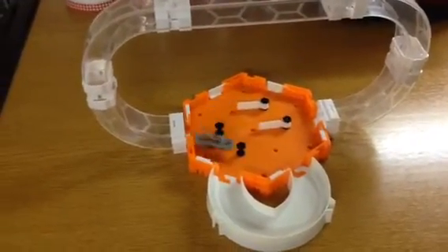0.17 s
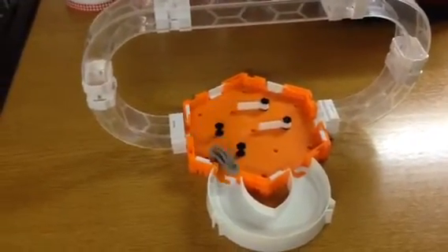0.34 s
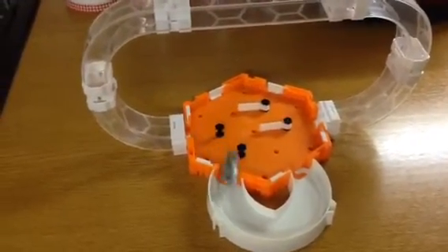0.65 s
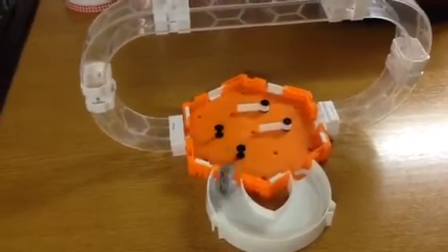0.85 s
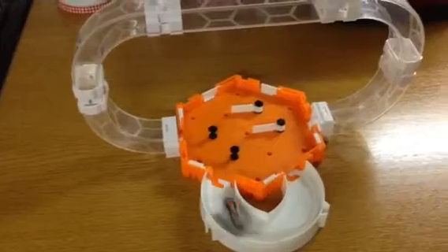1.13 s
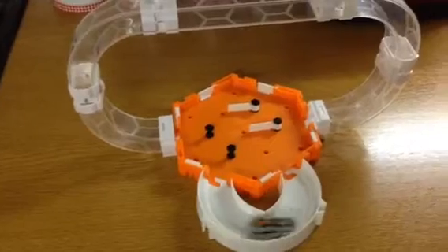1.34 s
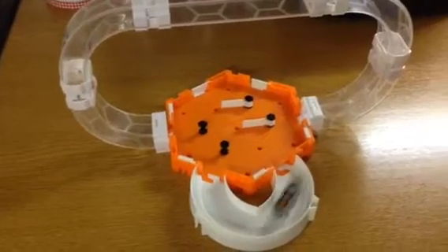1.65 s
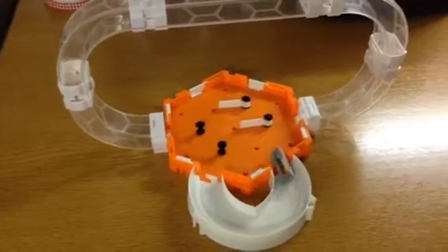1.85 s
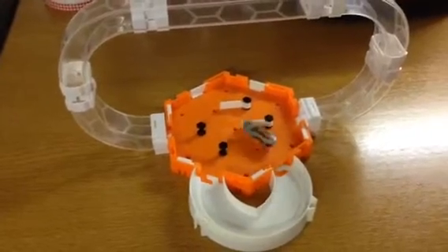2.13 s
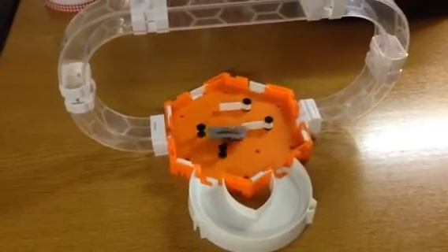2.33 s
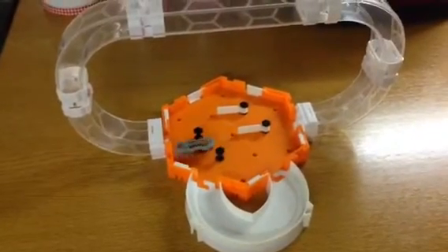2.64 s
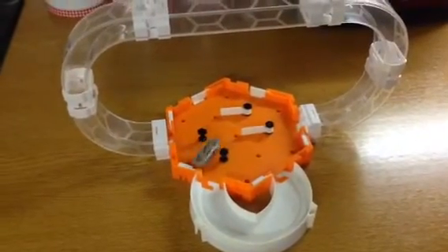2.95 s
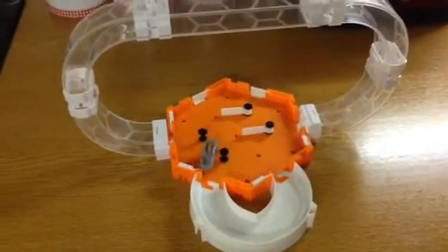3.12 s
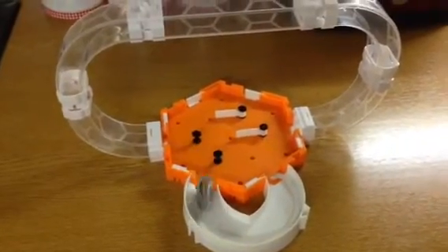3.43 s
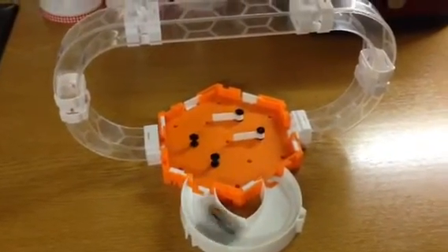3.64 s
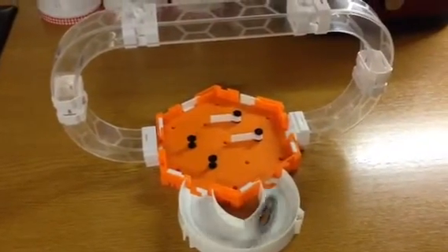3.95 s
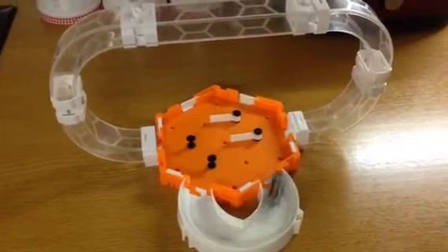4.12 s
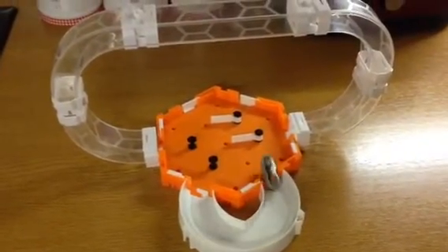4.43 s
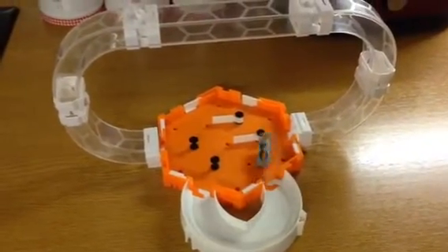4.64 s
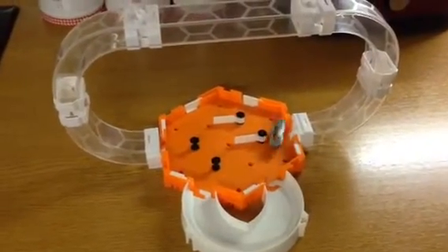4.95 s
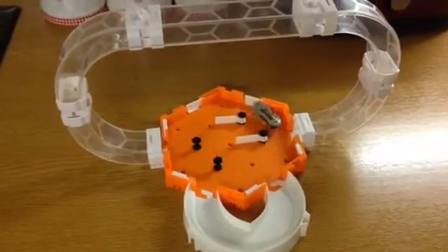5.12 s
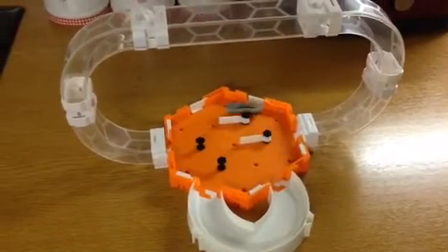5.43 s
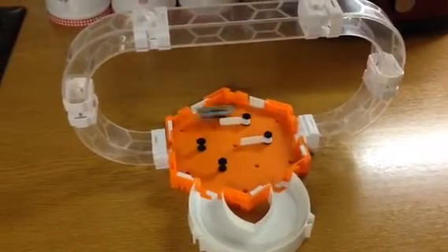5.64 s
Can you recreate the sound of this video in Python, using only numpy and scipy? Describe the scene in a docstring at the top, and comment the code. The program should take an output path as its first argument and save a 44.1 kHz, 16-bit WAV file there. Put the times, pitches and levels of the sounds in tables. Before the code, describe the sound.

A small vibrating toy bug runs for about six seconds in a plastic arena on a wooden table, heard close in a small, quiet room with faint hiss. A wavering motor buzz near 150 Hz paces a dense, dry patter of legs, with a thin high whirr above and an uneven low drone in the table. Light grazes chatter along the walls throughout. Around 0.45-0.65 s there are a knock and several soft, dull thuds. From about 0.8 to 1.8 s, in the curved track, the patter is duller and quieter, with a brief rough joint chirp near 1.65. At 2.2 s a tight burst of hard clacks makes the plastic ring, the loudest moment. Sharp clicks follow at 2.64, 2.93 and 3.12. A second, softer loop lasts from about 3.5 to 4.3 s, then brighter rattling returns, with knocks near 4.27, 4.73, 4.95, 5.3 and 5.62, still buzzing at the end.

```python
"""Vibrating toy bug in a plastic arena

A motor whirrs and legs tap once per turn: noise bursts and short modes paced by a wavering motor clock. Knocks
and wall grazes are trains of filtered noise, each with its own brightness and spot resonance. The plastic rings
and a loose joint chirps as damped modes; the wooden table drones and thuds. A small room adds a diffuse noise
tail and a faint hiss."""
import sys
import numpy as np
from scipy import signal
from scipy.fft import rfft, irfft, next_fast_len
from scipy.io import wavfile
from scipy.ndimage import uniform_filter1d, map_coordinates

SR = 44100
rng = np.random.default_rng(int(sys.argv[2]) if len(sys.argv) > 2 else 0)


def digitize_waveform(pressure):
    """Quantize a signal to 16-bit integers and store it at the path in sys.argv[1].

    Rows of a 2-D input are taken as channels; values are limited to [-1, 1].
    """
    field = np.atleast_2d(pressure).T
    bounded = np.clip(field, -1, 1)
    quanta = np.round(bounded * 32767).astype(np.int16)
    wavfile.write(sys.argv[1], SR, quanta)


N = 254898

MOTOR_HZ = 154.5
TOP_HZ = 15650


def footfalls(waver, scatter_s, spread_db):
    """One landing per turn of the wavering motor, each a little early or late and of its own strength."""
    turns = np.cumsum(MOTOR_HZ * np.exp(waver * wobble(14))) / SR
    at = np.flatnonzero(np.diff(np.floor(turns)))
    late, size = rng.uniform(-0.99, 1, (len(at), 2)).T
    at = np.clip(at + scatter_s * SR * late, 0, N - 1).astype(int)
    return np.bincount(at, amp(spread_db * size), N)


# Leg drive on the plastic, least where the bug coasts. Each row: time in s, relative patter level in dB.
LEG_DRIVE = [(0.0, -48), (0.25, -57.5), (0.58, -52.5), (0.72, -55.5), (0.98, -57), (1.09, -52.5),
             (1.22, -50), (1.36, -57.5), (1.48, -60), (1.63, -58), (1.78, -48), (2.08, -55), (2.28, -48),
             (2.55, -50), (2.74, -55), (2.95, -51.5), (3.07, -62), (3.2, -49.5), (3.48, -62), (3.6, -52),
             (3.85, -55), (4.05, -59), (4.3, -50), (4.55, -56), (4.9, -51.5), (5.0, -47), (5.14, -51.5),
             (5.33, -55.5), (5.52, -55), (5.78, -53)]
# Filters of leg patter and leg scratch. Each row: frequency in Hz, relative level in dB.
PATTER_TONE = [(40, -100), (250, -2), (550, -7.5), (780, -0.5), (950, -8), (1300, -2), (1800, 1),
               (2300, -9), (2900, -15), (4500, -12.5), (15000, -48)]
SCRATCH_TONE = [(1500, -26), (2500, -25), (3400, 4.5), (4500, 2), (5300, -1), (8500, -10), (11000, -31),
                (15500, -24)]
TRAY_SCRATCH_DB, LOOP_SCRATCH_DB = 0, -5.5  # relative to the patter setting


def legs(steps, tap_t60, flutter_db):
    """Each landing is a tiny noise burst on a new spot of the plastic floor."""
    patter_db, = curves(LEG_DRIVE)
    scratch_db = patter_db + by_place(TRAY_SCRATCH_DB, LOOP_SCRATCH_DB)
    t = np.arange(SR // 20) / SR
    # separate spots: energies add
    energy = np.abs(signal.fftconvolve(steps ** 2, fade(t, tap_t60) ** 2)[:N])
    force = np.sqrt(energy) * amp(flutter_db * wobble(45))
    patter_noise, scratch_noise = force * rng.standard_normal((2, N))
    patter = amp(patter_db - 6.5) * toned(patter_noise, PATTER_TONE)
    scratch = amp(scratch_db - 7.5) * toned(scratch_noise, SCRATCH_TONE)
    return patter + scratch


def leg_ticks(steps, level_db, tray_hz, loop_hz, spread_octaves, t60_cycles):
    """Every landing also clicks, with three short modes of its own."""
    at, t = np.flatnonzero(steps), np.arange(SR // 50) / SR
    draws = rng.standard_normal((len(at), 2, 3))
    pitch, size = draws.transpose(1, 0, 2)[..., None]
    centre_hz = by_place(tray_hz, loop_hz)[at, None, None]
    hz = np.minimum(centre_hz * 2 ** (spread_octaves * pitch), TOP_HZ)
    decay = np.exp(-np.log(1000) * hz * t / t60_cycles)
    modes = size * decay * np.sin(2 * np.pi * hz * t)
    clicks = np.sqrt(steps[at, None]) * np.sum(modes, axis=1)
    where = at[:, None] + np.arange(len(t))
    train = np.bincount(where.ravel(), clicks.ravel(), N)[:N]
    return amp(curves(LEG_DRIVE)[0] + level_db) * unit(train)


WHIRR_HZ, WHIRR_WIDTH_HZ = 8380, 330
TRAY_WHIRR_DB, LOOP_WHIRR_DB = -70.5, -79  # before the swell


def whirr(steps, turn_t60, waver_db, follows):
    """The motor rubs once a turn and sings in one narrow, high band, louder the harder the bug shakes."""
    shake_db, = curves(TABLE_SHAKE)
    decay = fade(np.arange(SR // 10) / SR, turn_t60)
    rub = np.sqrt(np.abs(signal.fftconvolve(steps, decay)[:N]))
    noise = rub * rng.standard_normal(N)
    band = filtered(noise, lambda f: resonance(f, WHIRR_HZ, WHIRR_WIDTH_HZ))
    swell_db = follows * (shake_db - shake_db.mean()) + waver_db * wobble(12)
    return amp(by_place(TRAY_WHIRR_DB, LOOP_WHIRR_DB) + swell_db) * unit(band)


# Short hits on a wall or peg. Each row: start in s, relative level in dB, click in relative dB,
# knock in relative dB, resonance of the spot in Hz.
KNOCKS = [(0.446, -44, 10, 1, 8920), (0.4724, -29.5, -0.5, 2, 1900), (0.663, -41, -6, -3, 2670),
          (0.7398, -45, -3, -6, 9000), (0.814, -44, -38, 2, 1760), (1.3115, -42.5, -22, -6, 1900),
          (1.3265, -43.5, -13, -6, 1920), (1.4805, -49.5, -35, 0, 1850), (1.5585, -44, -20, -5, 1380),
          (2.1733, -27.5, -9.5, -6, 1700), (2.2013, -27, -8, -8, 2440), (2.2071, -23.5, 4, 3, 3160),
          (2.2136, -19.5, -6.5, -4, 2400), (2.221, -20.5, 3, -15, 2480), (2.2256, -17, 2, -5, 2500),
          (2.2445, -37, -20, 5, 3430), (2.251, -33, -14, -9, 2030), (2.261, -30.5, -14, -4, 1386),
          (2.288, -38, -22, -8, 2200), (2.3882, -35, -11, -19, 2240), (2.6347, -31, 21, -16, 8450),
          (2.64, -31.5, -11, -3, 1830), (2.9289, -29.5, -2, -11, 3340), (2.936, -35, -15, -10, 2870),
          (3.1172, -30.5, -7, 2, 2420), (3.1211, -25, -8, 5.5, 2000), (3.126, -29, -15, 6, 965),
          (3.138, -39, -15, 3, 1540), (4.263, -29.5, -21, -7, 2050), (4.2695, -33, -21.5, -9, 1540),
          (4.32, -40, -5, -9, 8700), (4.7306, -30.5, -14.5, -14, 1540), (4.947, -23.5, -8, -11.5, 1680),
          (4.9533, -35, -11, -18, 1680), (4.973, -36, -11, -21, 3320), (5.3022, -29.5, -15, -20, 2360),
          (5.3085, -29.5, -13.5, -6, 1550), (5.3165, -39, -9, -14, 3300), (5.6215, -26, -19.5, -30, 2380),
          (5.63, -34.5, -8, -28, 6900), (5.6888, -39, -2.5, -7, 1730), (5.7339, -41, -8, -19, 9200)]
# Grazes along a wall. Each row: start in s, relative level in dB, click in relative dB,
# chatter time in s, time to the hardest press in s, resonance of the spot in Hz.
GRAZES = [(0.001, -37.5, -12, 0.018, 0, 3470), (0.048, -40.5, -10, 0.027, 0.00037, 3250),
          (0.084, -33, -14, 0.013, 0.011, 2133), (0.131, -43.5, -11.5, 0.049, 0, 1450),
          (0.212, -46.5, -20, 0.036, 0.0022, 3900), (0.274, -40.5, -12.5, 0.013, 0.015, 2430),
          (0.353, -44, -14.5, 0.012, 0.0079, 2460), (0.447, -38.5, -24, 0.013, 0, 880),
          (0.625, -41.5, -16.5, 0.085, 0, 2650), (0.905, -44.5, -38, 0.013, 0.0026, 1750),
          (1.017, -48, -19, 0.011, 0.006, 1500), (1.068, -41, -30, 0.021, 0.0022, 3100),
          (1.099, -39.5, -19, 0.017, 0.0034, 1390), (1.142, -40.5, -22, 0.017, 0.0015, 1810),
          (1.192, -40, -18.5, 0.023, 0, 1240), (1.222, -41.5, -21, 0.013, 0.0043, 1390),
          (1.34, -46, -20, 0.036, 0, 1400), (1.544, -41.5, -21, 0.012, 0, 2020),
          (1.694, -49, -7, 0.011, 0.012, 1900), (1.7122, -36.5, -23, 0.0075, 0, 1850),
          (1.772, -49.5, -10, 0.031, 0.011, 2080), (1.833, -33, -21.5, 0.016, 0, 1250),
          (1.922, -45.5, -14, 0.02, 0, 2030), (2.003, -40.5, -15, 0.0098, 0.0088, 1960),
          (2.055, -41, -23, 0.017, 0.0023, 1250), (2.098, -35, -17, 0.021, 0, 2000),
          (2.148, -35.5, -17, 0.022, 0, 1610), (2.388, -39, -11.5, 0.045, 0.0056, 1770),
          (2.45, -41.5, -15, 0.025, 0, 2400), (2.494, -43, -11, 0.032, 0.027, 3040),
          (2.597, -44, -10, 0.0094, 0, 1650), (2.702, -42.5, -16, 0.012, 0.01, 3730),
          (2.7685, -39.5, -16, 0.0087, 0, 1800), (2.842, -41.5, -9, 0.032, 0, 5930),
          (2.978, -40, -16, 0.034, 0, 3850), (3.0712, -41, -13, 0.018, 0, 1660),
          (3.2135, -38, -8, 0.01, 0, 900), (3.265, -46, -17, 0.015, 0.011, 3030),
          (3.343, -44, -13, 0.017, 0.0087, 2300), (3.515, -48.5, -29, 0.0087, 0.0018, 1230),
          (3.561, -37.5, -18.5, 0.013, 0.0036, 1250), (3.602, -45, -32, 0.056, 0.0065, 1540),
          (3.674, -42.5, -15.5, 0.018, 0, 1620), (3.8785, -38, -12, 0.014, 0.0033, 2860),
          (4.15, -44.5, -20.5, 0.099, 0.0082, 1230), (4.255, -41.5, -24, 0.041, 0.0029, 2180),
          (4.38, -34.5, -17, 0.027, 0.0003, 1000), (4.522, -41.5, -13.5, 0.021, 0.0038, 1980),
          (4.576, -44, -13.5, 0.015, 0, 1230), (4.659, -40.5, -10, 0.02, 0, 1650),
          (4.695, -40, -15, 0.045, 0, 1810), (4.798, -42, -19, 0.016, 0.0097, 1370),
          (4.892, -37, -17, 0.012, 0.0019, 2100), (5.045, -40.5, -17, 0.029, 0.00046, 1090),
          (5.097, -41, -17.5, 0.028, 0.00076, 3016), (5.187, -39.5, -10.5, 0.016, 0.0002, 3340),
          (5.212, -35.5, -7, 0.019, 0.021, 6800), (5.27, -41, -10, 0.02, 0.0033, 2430),
          (5.345, -41, -11, 0.014, 0, 2840), (5.386, -43, -10, 0.012, 0.0052, 6680),
          (5.419, -39, -8, 0.035, 0.0077, 9190), (5.544, -48.5, -12, 0.008, 0.00053, 3320),
          (5.577, -45, -16, 0.018, 0.011, 2450), (5.611, -36, -13, 0.018, 0.0014, 2340),
          (5.771, -43, -13, 0.012, 0, 3660)]
KNOCK_CHATTER_S = 0.004  # a short hit dies away within a turn or two
GRAZE_KNOCK_DB = -3  # body of a graze or brush
KNOCK_SPOT_DB, GRAZE_SPOT_DB = 11, 6.5
# light touches of the wall in between; level over the patter setting
BRUSHES_PER_S, BRUSH_DB, BRUSH_SPREAD_DB, BRUSH_SPOT_HZ = 6.5, 2, -11, 1340
TRAY_CLICK_DB, LOOP_CLICK_DB = -31, -13  # brush click on each kind of wall


def contacts(brush_chatter_s):
    """Knocks, grazes and chance brushes as common rows.

    Each row: start s, level dB, click dB, knock dB, spot Hz, spot lift dB, chatter s, swell s."""
    patter_db, click_db = curves(LEG_DRIVE)[0], by_place(TRAY_CLICK_DB, LOOP_CLICK_DB)
    late, size = rng.uniform(-1, 1, (80, 2)).T
    start_s = (np.arange(len(late)) + .5 + late / 2) / BRUSHES_PER_S
    brushes = []
    for n, k in zip((start_s * SR).astype(int), size):
        if n < N:
            db = patter_db[n] + BRUSH_DB + BRUSH_SPREAD_DB * k
            brushes.append((n / SR, db, click_db[n], brush_chatter_s, 0, BRUSH_SPOT_HZ))
    rows = [(*knock, KNOCK_SPOT_DB, KNOCK_CHATTER_S, 0) for knock in KNOCKS]
    for s, db, click, chatter_s, swell_s, hz in list(GRAZES) + brushes:
        rows.append((s, db, click, GRAZE_KNOCK_DB, hz, GRAZE_SPOT_DB, chatter_s, swell_s))
    return rows


# Base filter of every wall contact. Each row: frequency in Hz, relative level in dB.
BUMP_TONE = [(30, -64), (150, -42), (450, -18), (650, -20), (900, -14), (1250, -5), (1700, 4.5),
             (2200, 1.5), (2700, -3), (3400, 0.5), (5200, -5.5), (8000, -11), (11000, -17), (15500, -26)]
SPOT_Q = 14.8


def bumps(wall_t60, jitter_turns, spread_db, scrape_db, crack_db, first_touch_db, brightening):
    """The shaking body strikes the wall again on each turn, more weakly as it veers away."""
    out, t = np.zeros(N), np.arange(SR // 7) / SR
    turn = np.arange(14)
    for s, db, click_db, knock_db, spot_hz, spot_db, chatter_s, swell_s in contacts(brush_chatter_s=0.0066):
        def pressing(since):
            width_s = np.where(since < swell_s, swell_s, max(chatter_s, .002))
            return np.exp(-((since - swell_s) / width_s) ** 2)

        # a click above 0 dB adds a crack; below, the first touch is weaker
        sharpness = np.clip(click_db / 20, 0, 1)
        late, size = rng.uniform(-1.1, 1, (2, len(turn)))
        when = np.abs(turn + jitter_turns * late * (turn > 0)) / MOTOR_HZ
        size_db = np.where(turn > 0, spread_db * size, first_touch_db * (1 - sharpness))
        strength = amp(size_db) * pressing(when)
        blows = np.bincount((when * SR).astype(int), strength, len(t))[:len(t)]
        blows += amp(scrape_db) * pressing(t)
        # new spot, new dense damped modes per blow: energies add
        decay = fade(t, wall_t60) + sharpness * amp(crack_db) * fade(t, .005)
        energy = np.abs(signal.fftconvolve(blows ** 2, decay ** 2)[:len(t)])
        wall = np.sqrt(energy) * rng.standard_normal(len(t))
        # hard corners click, broad faces knock
        contact = [(350, 0), (900, knock_db + 16.0), (1500, 0), (2300, 0.013),
                   (3200, brightening * (click_db + 12.5)), (6000, click_db + 11.0)]

        def level_of(hz):
            spot = spot_db * np.abs(resonance(hz, spot_hz, spot_hz / SPOT_Q))
            return along(BUMP_TONE, hz) + along(contact, hz) + spot

        hit = coloured(wall, level_of)
        add(out, s, amp(db - 3.0) * hit / loudest(hit))
    return out


# Blows to the whole tray. Each row: time in s, relative level in dB, most excited pitch in Hz.
RINGS = [(0.56, -41.5, 1140), (2.2077, -26, 2700), (2.2237, -19.5, 2130)]
# Resonances of the plastic arena. Each row: frequency in Hz, width in Hz, lift in dB.
ARENA = [(780, 45, 4), (1233, 16, 10), (1396, 20, 6.5), (1610, 40, 4), (2117, 16, 5), (2392, 24, 9),
         (3100, 30, 5), (3182, 35, 6), (3578, 35, 5), (4432, 30, 4.5), (4651, 28, 6.5), (6188, 22, 7),
         (7209, 20, 6), (7422, 26, 7), (7849, 35, 6), (8520, 220, 2.5)]
RING_FALL_DB = 10.5  # loss one octave from the most excited pitch


def rings():
    """A blow to the whole tray rings its modes: a soft one the low ones, a hard one the higher."""
    out, t = np.zeros(N), np.arange(SR // 3) / SR
    for s, db, centre_hz in RINGS:
        modes = []
        for hz, width_hz, lift_db in ARENA:
            mode_db = lift_db - 11 - RING_FALL_DB * np.log2(hz / centre_hz) ** 2
            modes.append((hz, mode_db, np.log(1000) / (np.pi * width_hz)))
        add(out, s, amp(db) * ringing(modes, t) * (1 - fade(t, 0.011)))
    return out


# Chirps of a loose track joint as the bug crosses it.
# Each row: time in s, relative level in dB, brightness in dB per octave.
TICKS = [(1.5335, -43.5, 6), (1.606, -51.5, 1), (1.653, -35.5, -2.5), (3.998, -47, 0)]
# Modes of the joint. Each row: frequency in Hz, relative level in dB, t60 in s.
JOINT = [(2130, -2, 0.039), (2475, -1, 0.054), (3920, -2.5, 0.047), (5630, -9, .035), (7830, -16, .05),
         (11000, -26, 0.044)]
JOINT_BLUR_HZ = 75


def ticks(rise_s):
    """The loose joint rubs for an instant and answers with a short, rough chirp of damped modes."""
    out, t = np.zeros(N), np.arange(SR // 8) / SR
    for s, db, tilt_db in TICKS:
        modes = [(hz, mode_db + tilt_db * np.log2(hz), t60) for hz, mode_db, t60 in JOINT]
        chirp = ringing(modes, t, JOINT_BLUR_HZ) * (1 - fade(t, rise_s))
        add(out, s, amp(db - 4) * chirp / loudest(chirp))
    return out


# Position of the bug. Each row: time in s, place from 0 (tray) to 1 (loop of track).
PLACE = [(0.65, 0.48), (0.85, 0.61), (1.8, 1), (2.0, 0.61), (3.3, 0.13), (3.5, 0.96), (4.3, 1), (4.5, 0.69)]


def by_place(in_tray, in_loop):
    """A value per sample that moves from its tray to its loop setting with the bug."""
    return in_tray + (in_loop - in_tray) * np.clip(curves(PLACE)[0], 0, 1)


# How hard the bug shakes the table. Each row: time in s, relative level in dB.
TABLE_SHAKE = [(0.0, -67), (0.18, -59.5), (0.4, -66.5), (0.78, -59), (0.92, -65), (1.18, -57.5),
               (1.55, -70.5), (2.13, -54.5), (2.6, -62.5), (2.88, -56.5), (3.5, -68), (3.62, -58.5),
               (4.1, -70), (4.45, -60), (5.28, -58.5), (5.38, -60.5), (5.78, -65.5)]
# Drone filter of each part on the table. Each row: frequency in Hz, relative level in dB.
TRAY_DRONE = [(70, -39), (115, -22), (143, -2.5), (170, -10.5), (205, 4), (260, -5), (320, 6), (450, -38),
              (700, -44), (1500, -53)]
LOOP_DRONE = [(70, -62), (115, -2.5), (143, 1), (170, -0.5), (200, 3.5), (270, -12.5), (340, -9),
              (410, 4.5), (520, -23.5), (1500, -83)]
# Resonances of the table top. Each row: frequency in Hz, width in Hz, lift in dB.
TABLE_TOP = [(145.5, 6.3, 5), (199, 26, 4.5), (226, 11, 3)]


def table(steps, drone_db, rocking_db):
    """The landings shake the table top through whichever part the bug is on, unevenly as it rocks."""
    rocking = amp(rocking_db * np.tanh(wobble(14)))
    shaken = with_resonances(steps * rocking, TABLE_TOP)
    drone = by_place(toned(shaken, TRAY_DRONE), toned(shaken, LOOP_DRONE))
    return amp(curves(TABLE_SHAKE)[0] + drone_db) * unit(drone - drone.mean())


# Dull thuds through the table. Each row: time in s, relative level in dB, boom pitch in Hz.
THUDS = [(0.479, -39, 87), (0.531, -39.5, 166), (0.56, -43, 146.6), (0.62, -42, 215), (0.653, -45.5, 207),
         (2.094, -46.5, 184), (2.31, -45.5, 173), (4.69, -49.5, 139.3)]
# Filter of the puff. Each row: frequency in Hz, relative level in dB.
THUD_TONE = [(25, -37), (55, -22), (110, -5.5), (160, -9), (230, -6), (280, -8.5), (370, -10), (600, -21),
             (1300, -72)]


def thuds(t60, level_db, boom_db, boom_t60):
    """Soft jolts through the table: a dull noise puff and a low damped boom that outlasts it."""
    out, t = np.zeros(N), np.arange(SR // 3) / SR
    swell = 1 - fade(t, .035)
    for s, db, hz in THUDS:
        puff = amp(level_db) * toned(rng.standard_normal(len(t)), THUD_TONE) * fade(t, t60)
        boom = ringing([(hz, boom_db, boom_t60)], t)
        add(out, s, amp(db) * swell * (puff + boom))
    return out


# Decay of the room. Each row: frequency in Hz, t60 in s.
ROOM = [(200, 0.84), (1000, 0.21), (5000, 0.37), (14000, 0.29)]


def room(x, wet_db, delay_s):
    """A diffuse tail of decaying noise, drawn anew every third of a second."""
    out, block = np.zeros(N), SR // 3
    for start in range(0, N, block):
        hz, t, z = signal.stft(rng.standard_normal(SR // 2), SR, nperseg=256)
        decay = np.exp(-np.log(1000) * t / along(ROOM, hz)[:, None])
        tail = signal.istft(z * decay, SR)[1]
        tail /= np.linalg.norm(tail)
        add(out, start / SR + delay_s, signal.fftconvolve(x[start:start + block], tail))
    return x + amp(wet_db) * out


# Filter of the background hiss. Each row: frequency in Hz, relative level in dB.
ROOM_TONE = [(20, -26), (35, -23), (60, -2.5), (150, -4.5), (300, 2.5), (600, 0), (1500, -2.5), (3000, -16),
             (7000, -12), (13500, -15), (15200, -11)]


def room_hiss(level_db):
    """Steady filtered noise of the quiet room."""
    return amp(level_db) * toned(rng.standard_normal(N), ROOM_TONE)


def ringing(modes, t, blur_hz=0):
    """A sum of damped (Hz, dB, t60 s) modes, each roughened by phase drift into a band blur_hz wide."""
    out = np.zeros(len(t))
    for hz, db, t60 in modes:
        cycles = hz * t + rng.random()
        steps = rng.standard_normal(len(t))
        drift = np.cumsum(steps) * np.sqrt(2 * np.pi * abs(blur_hz) / SR)
        out += amp(db) * fade(t, t60) * np.sin(2 * np.pi * cycles + drift)
    return out


def resonance(f, hz, width):
    """The complex response of one resonance at the frequencies f."""
    return 1j * f * width / (hz * hz - f * f + 1j * f * width)


def with_resonances(x, modes):
    """x with narrow (Hz, width Hz, lift dB) resonances added."""
    def response(f):
        return 1 + sum((amp(db) - 1) * resonance(f, hz, width) for hz, width, db in modes)
    return filtered(x, response)


def filtered(x, response):
    """x times a complex response of frequency."""
    m = next_fast_len(len(x) + SR // 2)
    return irfft(rfft(x, m) * response(np.fft.rfftfreq(m, 1 / SR)), m)[:len(x)]


def coloured(x, level_of):
    """x through the minimum-phase filter whose level in dB is level_of(Hz)."""
    m = 2 * next_fast_len(len(x) // 2 + 1024)
    cepstrum = irfft(np.log(amp(level_of(np.fft.rfftfreq(m, 1 / SR)))), m)
    # fold to causal
    cepstrum[1:m // 2] *= 2
    cepstrum[m // 2 + 1:] = 0
    return irfft(rfft(x, m) * np.exp(rfft(cepstrum)), m)[:len(x)]


def toned(x, spectrum):
    """x filtered by (Hz, dB) points, at rms 1."""
    return unit(coloured(x, lambda hz: along(spectrum, hz)))


def amp(db):
    """Decibels to gain."""
    return 10 ** (np.asarray(db) / 20)


def unit(x):
    """x at rms 1."""
    return x / np.sqrt(np.mean(x ** 2) + 1e-20)


def loudest(x):
    """The rms of the strongest 5 ms."""
    return np.sqrt(uniform_filter1d(x ** 2, size=220).max())


def along(points, hz):
    """(Hz, value) points read on a log-frequency axis."""
    f, v = np.transpose(points)
    return np.interp(np.log(hz + 1), np.log(f + 1), v)


def curves(rows):
    """One value per sample for each column after the time."""
    s, *cols = np.transpose(rows)
    return [np.interp(np.arange(N) / SR, s, c) for c in cols]


def wobble(rate):
    """A smooth random curve, rate knots a second."""
    knots = rng.standard_normal(int(N * rate / SR) + 4)
    return map_coordinates(knots, [np.arange(N) * rate / SR])


def fade(t, t60):
    """A decay of 60 dB in t60 seconds."""
    return np.exp(-np.log(1000) * t / max(t60, 1e-4))


def add(track, s, sound):
    """Mix a sound into the track at s seconds."""
    part = track[max(round(s * SR), 0):][:len(sound)]
    part += sound[:len(part)]


def scene():
    """Bug, arena and table in a quiet room."""
    steps = footfalls(waver=.11, scatter_s=.0018, spread_db=5.5)
    patter = legs(steps, tap_t60=.032, flutter_db=.6)
    patter += leg_ticks(steps, level_db=-5, tray_hz=2400, loop_hz=1800, spread_octaves=.5, t60_cycles=30)
    motor = whirr(steps, turn_t60=0.015, waver_db=3.5, follows=0.34)
    knocks = bumps(wall_t60=0.038, jitter_turns=.4, spread_db=3.0, scrape_db=-22.0, crack_db=11.0,
                   first_touch_db=-2.5, brightening=0.39)
    plastic = with_resonances(patter + knocks, ARENA) + rings()
    toy = room(plastic + motor + ticks(rise_s=0.014), wet_db=-8.5, delay_s=0.0055)
    hiss = room_hiss(level_db=-62.5)
    drone = table(steps, drone_db=-0.45, rocking_db=4.0)
    jolts = thuds(t60=0.16, level_db=-0.5, boom_db=-3.5, boom_t60=0.22)
    return (toy + drone + jolts + hiss)[None]


def record(dry):
    """A brick-wall low-pass: nothing passes from TOP_HZ up."""
    m = next_fast_len(N + SR // 2)
    passed = np.fft.rfftfreq(m, 1 / SR) < TOP_HZ
    return irfft(rfft(dry, m) * passed, m)[:, :N]


dry = scene()
out = record(dry)
digitize_waveform(out)
```